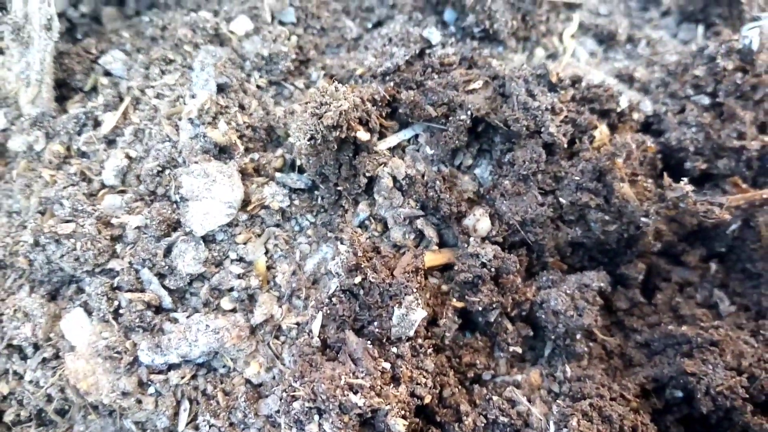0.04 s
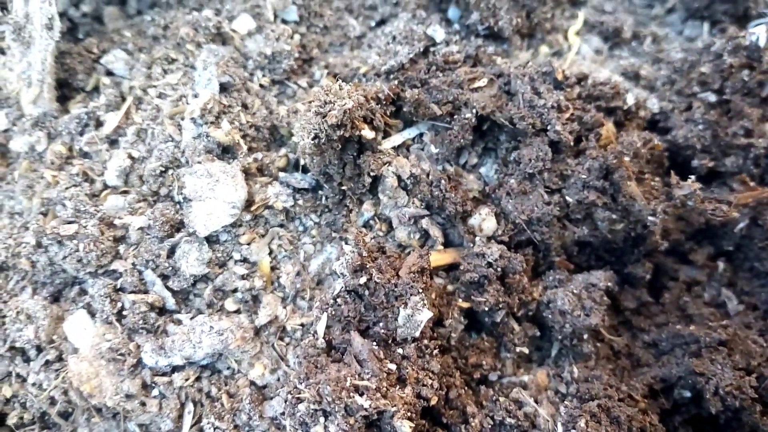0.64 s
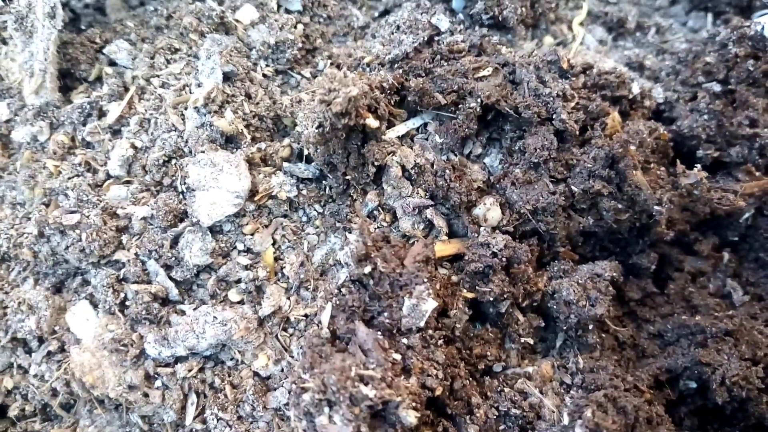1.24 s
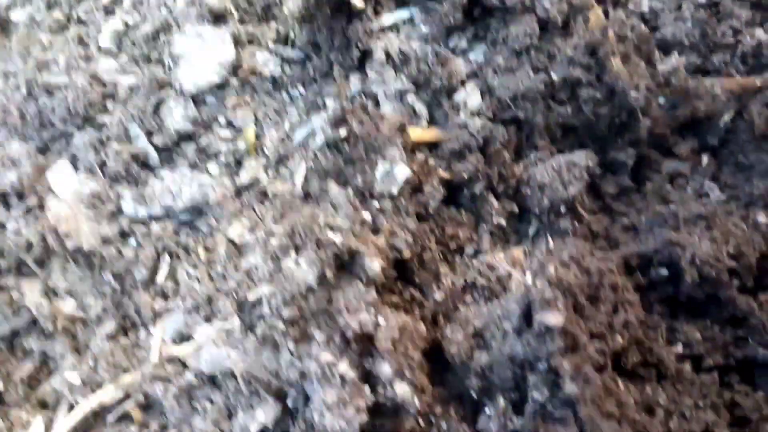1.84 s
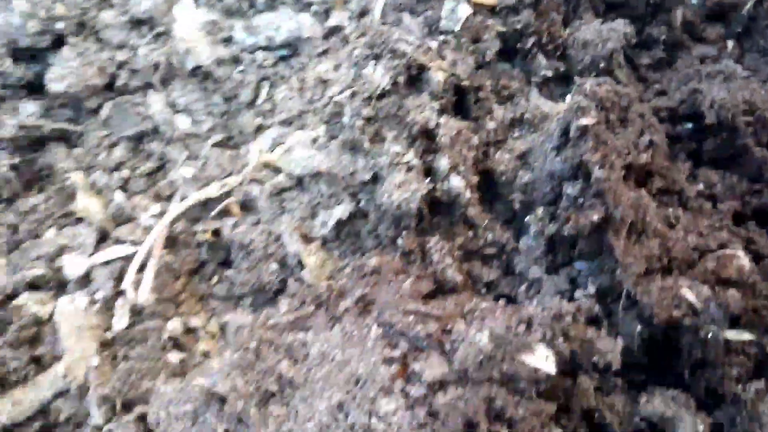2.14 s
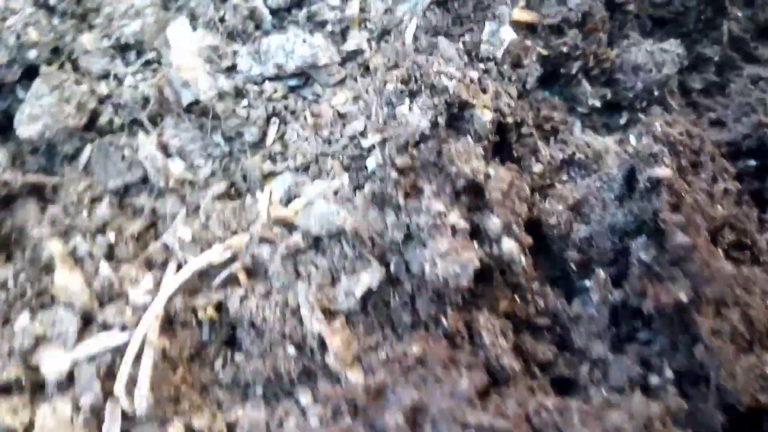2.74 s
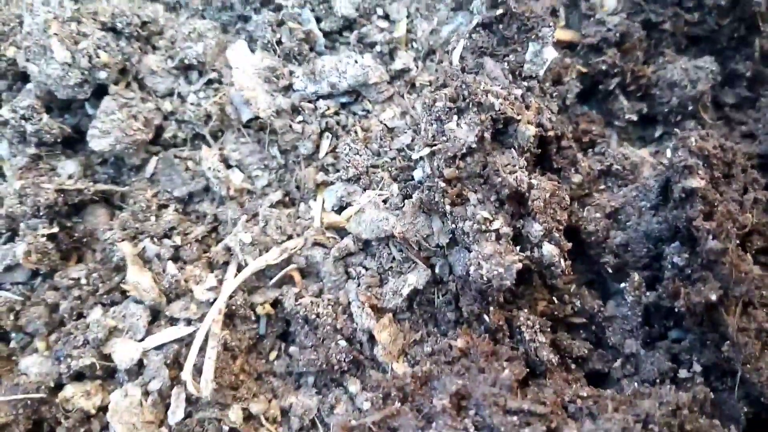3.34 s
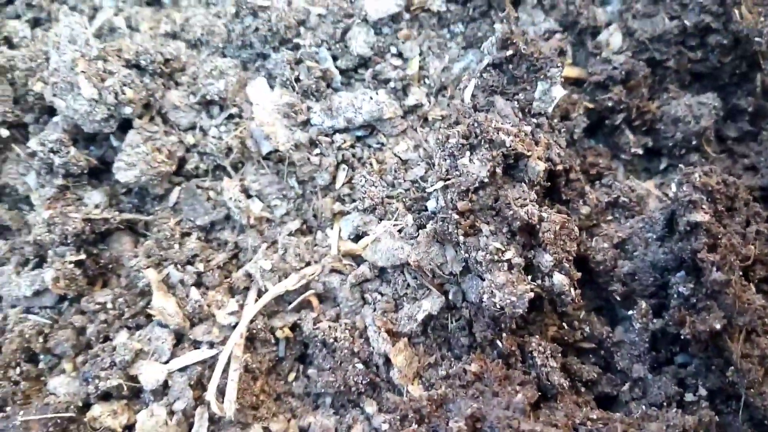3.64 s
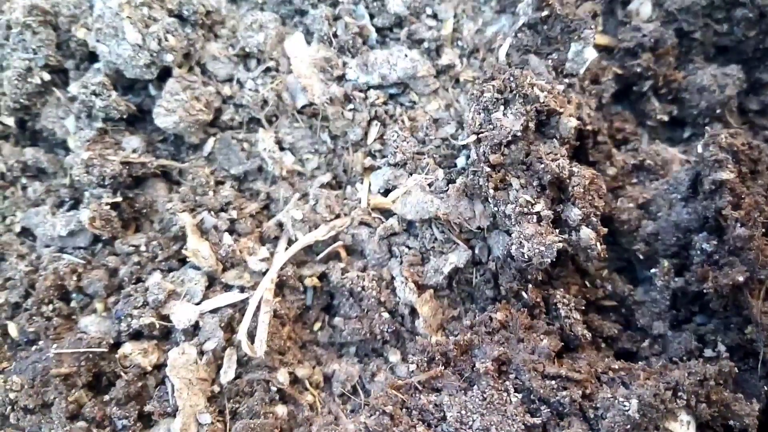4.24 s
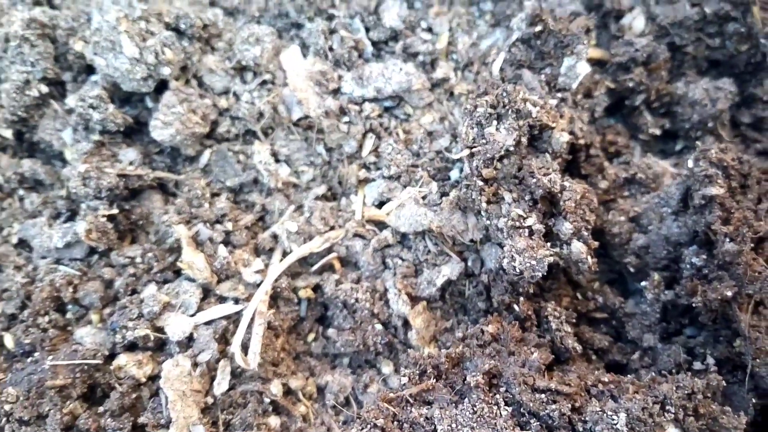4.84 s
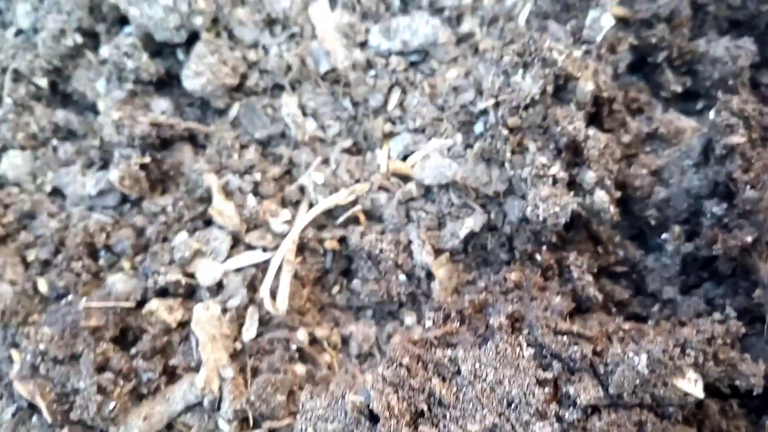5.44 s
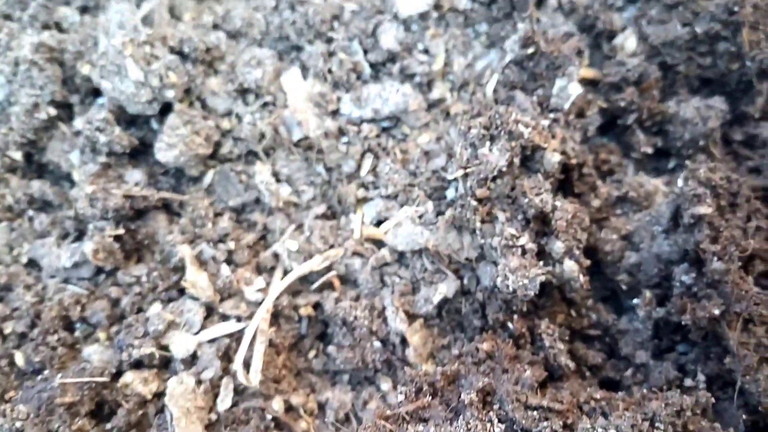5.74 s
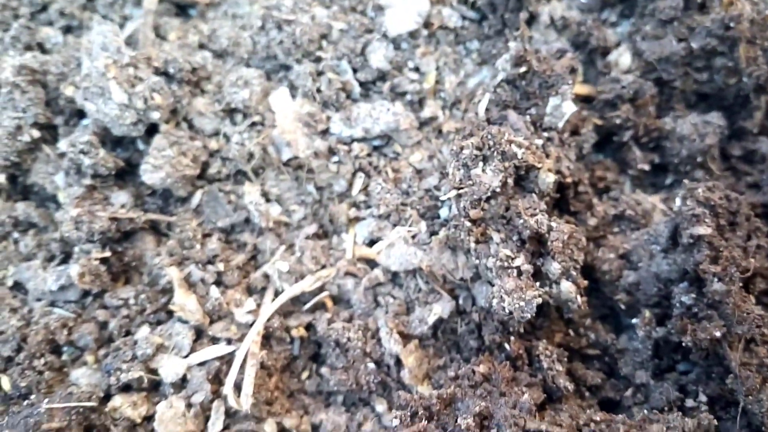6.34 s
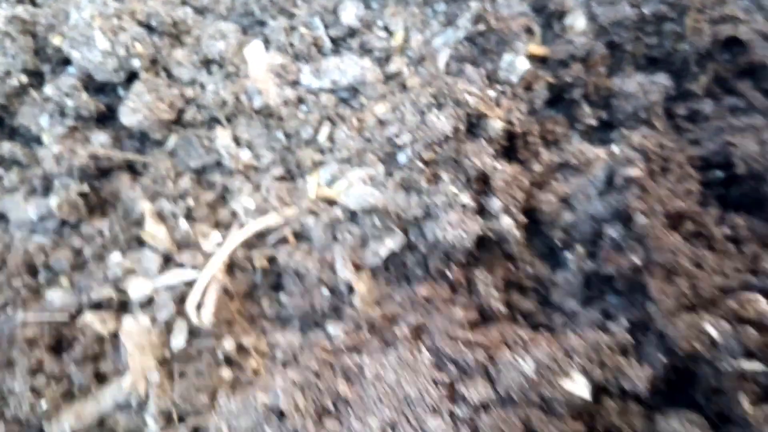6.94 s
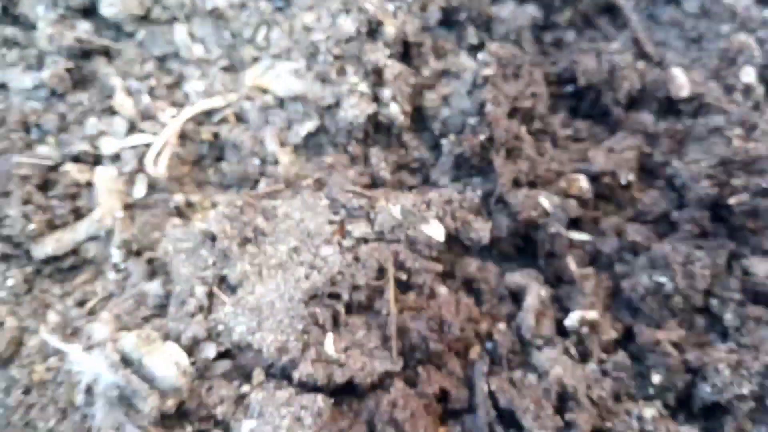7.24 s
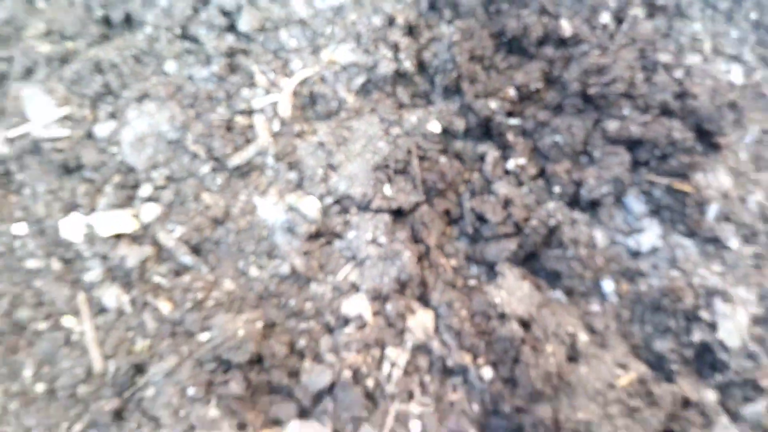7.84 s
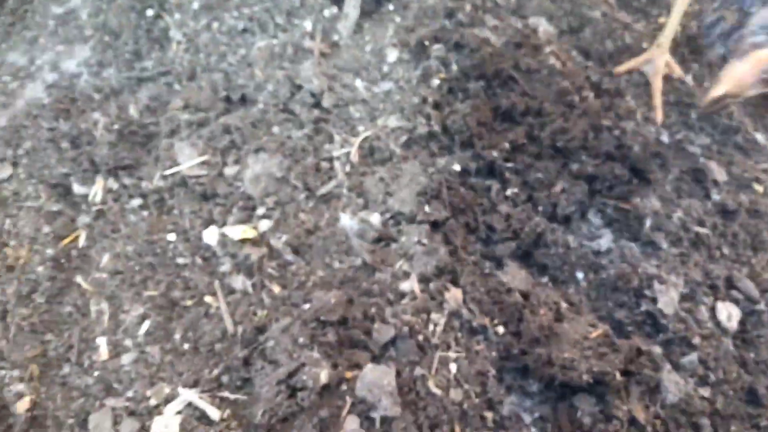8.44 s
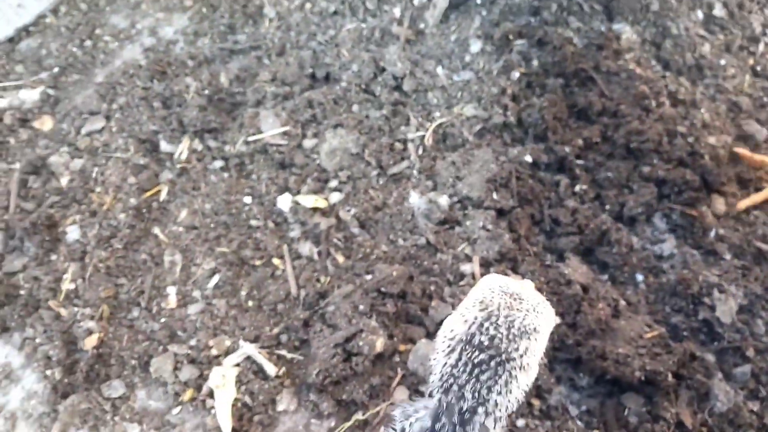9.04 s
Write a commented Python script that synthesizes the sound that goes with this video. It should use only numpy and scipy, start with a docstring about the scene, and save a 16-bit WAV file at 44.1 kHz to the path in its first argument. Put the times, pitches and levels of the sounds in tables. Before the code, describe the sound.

Young chicks peep in short, high whistles close to a single microphone just above loose farmyard soil, while beaks peck and feet scratch in the grit. A hen gives one soft, low cluck as the peeping gets busier. Past the middle a rooster crows once, loud and brassy, ringing off the walls. The chicks then resume, with one quick trill. A small bird chirps far off over a low outdoor rumble.

```python
"""A rooster crows once in a farmyard, and the walls ring after him.
His syrinx pulses through throat and open beak, rattling at the break between registers.
Close to the single microphone, just above loose soil, chicks peep and trill in near-sine whistles,
feet scratch, beaks peck in the grit, and a hen gives one low cluck before the crow.
Far off a small bird chirps over a low outdoor rumble; a faint ringing tone passes at the start."""
import sys
import numpy as np
from scipy import signal
from scipy.fft import rfft, irfft
from scipy.io import wavfile
from scipy.ndimage import uniform_filter1d, minimum_filter1d

SR = 44100
rng = np.random.default_rng(int(sys.argv[2]) if len(sys.argv) > 2 else 0)


def generate_wav(sig):
    """Save sig (samples, or channels by samples) to the path in sys.argv[1] as 16-bit PCM at SR."""
    pcm = np.round(np.clip(np.atleast_2d(sig).T, -1, 1) * 32767).astype(np.int16)
    wavfile.write(sys.argv[1], SR, pcm)


N = 404749
CUTOFF_HZ = 15800


def from_db(db):
    """Decibels to gain."""
    return 10 ** (np.asarray(db) / 20)


def rms_one(x):
    """Scale to rms 1."""
    return x / np.sqrt(np.mean(x ** 2) + 1e-20)


def at_hz(points, hz):
    """Read a curve on a log-frequency axis."""
    points = np.array(points)
    return np.interp(np.log(hz + 1e-9), np.log(points[:, 0]), points[:, 1])


def sampled(rows):
    """Sample times across a curve, and each of its columns at those times."""
    times, *columns = np.transpose(rows)
    t = np.arange(int(times[0] * SR), int(times[-1] * SR)) / SR
    return [t] + [np.interp(t, np.sort(times), column) for column in columns]


def add(out, start_s, sound):
    """Mix a sound in at its time."""
    at = int(round(start_s * SR))
    sound, at = sound[max(-at, 0):], max(at, 0)
    out[at:at + len(sound)] += sound[:max(N - at, 0)]


def coloured(x, spectrum, size=4096):
    """Minimum-phase filter with this spectral shape; white noise keeps its power."""
    gains = from_db(at_hz(spectrum, np.arange(size // 2 + 1) * SR / size))
    cepstrum = irfft(np.log(gains))
    cepstrum[1:size // 2] *= 2
    cepstrum[size // 2 + 1:] = 0
    response = irfft(np.exp(rfft(cepstrum)))
    return signal.fftconvolve(x, response / np.linalg.norm(response))[:len(x)]


def drift(rate_hz, size):
    """Smooth random wander with spread near 1: noise twice through a one-pole low-pass."""
    pole = np.exp(-2 * np.pi * rate_hz / SR)
    wander = signal.lfilter([1], [1, -2 * pole, pole * pole], rng.standard_normal(size + SR))
    return rms_one(wander)[-size:]


def swell(u, crest, power):
    """Rise to 1 at the crest and fall again, for u from 0 to 1."""
    triangle = np.interp(u, [0, np.clip(crest, .05, .95), 1], [0, 1, 0])
    return np.sin(np.pi / 2 * triangle) ** power


def bump(t, centre_s, width_s):
    """A smooth rise and fall about one moment."""
    return np.exp(-((t - centre_s) / width_s) ** 2)


def phase_of(pitch):
    """Running phase of an oscillator."""
    return 2 * np.pi * np.cumsum(pitch) / SR


def harmonics(pitch, throat, count):
    """Pulses of the syrinx heard through the throat: one row per harmonic, and their frequencies."""
    k = np.arange(1, count + 1)[:, None]
    gains = from_db(at_hz(throat, k * pitch)) * (k * pitch < CUTOFF_HZ)
    gains = gains / np.sqrt(np.sum(gains ** 2, axis=0) / 2)
    return gains * np.cos(k * phase_of(pitch)), k * pitch


def whistle(pitch, octave_db, jitter, flutter_db):
    """A near-sine whistle; it dulls above 6 kHz, so lower notes keep more overtones."""
    # the treble falls away: f/Hz, gain/dB
    treble_rolloff = [(1700, -5), (2300, -0.5), (6000, -0.5), (7000, -17.5), (8000, -31), (12000, -20.5),
                      (15000, -23.5)]
    phase = phase_of(pitch * (1 + jitter * drift(600, len(pitch))))
    partials = [(1, 0), (2, octave_db), (3, octave_db - 10)]
    tone = sum(from_db(db + at_hz(treble_rolloff, k * pitch)) * np.sin(k * phase) for k, db in partials)
    return np.sqrt(2) * tone * from_db(flutter_db * drift(160, len(pitch)))


def outdoors(hiss_db=-61):
    """The bed of the place: a low, wavering rumble of open air and a thin hiss."""
    # spectrum of the rumble: f/Hz, relative density/dB
    rumble_spectrum = [(15, -61), (25, -21.5), (37, -14.5), (59, -12), (112, 1), (231, -9.5), (405, -19),
                       (592, -20), (997, -26.5), (1520, -27.5), (1710, -30), (2510, -28), (2710, -29),
                       (3000, -33.5), (3900, -76.5), (6600, -120)]
    # course of the rumble: t/s, relative level/dB
    rumble_levels = [(0, -46), (5.5, -44.5), (5.75, -47.5), (6.26, -50), (6.381, -45.5), (7.0, -41.5),
                     (9.17, -44.5)]
    # spectrum of the hiss: f/Hz, relative density/dB
    hiss_spectrum = [(1000, -3.5), (2500, -6), (4500, 2.5), (6300, -4), (7800, -16), (13800, -19),
                     (15200, -7), (16000, -17)]
    level_db = np.interp(np.arange(N) / SR, *np.transpose(rumble_levels)) - 1 + .68 * drift(11, N)
    rumble = from_db(level_db) * coloured(rng.standard_normal(N), rumble_spectrum)
    return rumble + from_db(hiss_db) * coloured(rng.standard_normal(N), hiss_spectrum)


def ringing():
    """A faint cluster of steady tones swells and fades."""
    # course of the ringing: t/s, level/dB
    envelope = [(.08, -65), (.16, -46), (.26, -39), (.32, -46.5), (.46, -48.5), (.66, -55.5)]
    # its tones: f/Hz, relative level/dB
    tones = [(2920, -14), (3310, -3.5), (3760, -17), (4160, -11.5)]
    t, level_db = sampled(envelope)
    out = np.zeros(N)
    for hz, db in tones:
        tone = whistle(np.full(len(t), hz), octave_db=-40, jitter=.0089, flutter_db=2.5)
        add(out, t[0], from_db(level_db + db) * tone)
    return out


def far_bird(upper_hz=4620, lower_hz=4230, sag=.28, scatter_t60_s=.69):
    """Hoarse two-voiced chirps, the lower voice sagging at the end, smeared by distance."""
    # chirps: t/s, length/s, relative level/dB
    chirps = [(-.03, 0.13, -44.5), (.72, .14, -42.5), (2.822, 0.14, -29), (4.532, 0.073, -31),
              (7.157, .14, -27.5), (9.128, 0.098, -31)]
    direct = np.zeros(N)
    for start, length, db in chirps:
        u = np.linspace(0, 1, int(length * SR))
        upper = whistle(np.full(len(u), upper_hz), octave_db=-24, jitter=.027, flutter_db=-4)
        lower = whistle(lower_hz * (1 - sag * u ** 4), octave_db=-36, jitter=.03, flutter_db=3.5)
        add(direct, start, from_db(db) * swell(u, .56, power=.58) * (upper + lower) / 2)
    paths = rng.standard_normal(SR // 2) * from_db(-60 * np.arange(SR // 2) / SR / scatter_t60_s)
    scattered = signal.fftconvolve(direct, paths / np.linalg.norm(paths))[:N]
    return .41 * direct + .39 * scattered


def yard(x, wall_hz=2200, build_s=.032):
    """A few dull wall echoes and a diffuse tail that rings longest near 1.5 kHz."""
    # echoes off the walls: delay/s, level/dB
    echoes = [(.0125, -18), (.031, -12), (.058, -13), (.092, -21.5)]
    # bands of the tail: f/Hz, level/dB, t60/s
    tail = [(600, -4.5, 0.48), (1110, -27.5, 0.37), (1520, -6, 0.92), (1840, -3, .45), (3000, -10.5, 0.75),
            (5560, -28, 0.22)]
    t, response = np.arange(SR) / SR, np.zeros(SR)
    for delay, db in echoes:
        response[int(delay * SR)] += from_db(db)
    response = signal.sosfilt(signal.butter(2, wall_hz, fs=SR, output="sos"), response)
    centres = np.array(tail)[:, 0]
    edges = [100, *np.sqrt(centres[1:] * centres[:-1]), CUTOFF_HZ]
    for (_, db, t60), low, high in zip(tail, edges, edges[1:]):
        decay = from_db(-60 * t / t60) * np.clip(t / build_s, 0, 1)
        diffuse = rng.standard_normal(SR) * decay / np.linalg.norm(decay)
        band = signal.butter(2, [low, high], "band", fs=SR, output="sos")
        response += from_db(db) * signal.sosfilt(band, diffuse)
    return signal.fftconvolve(x, response)[:N]


def grains(per_s, spread_db, size):
    """Crumbs of soil clicking at random, a few much louder than the rest; rms 1."""
    strengths = from_db(spread_db * np.minimum(rng.exponential(1, size), 4))
    clicks = strengths * rng.standard_normal(size)
    return rms_one(clicks * (rng.random(size) < per_s / SR))


def soil(rustle_db=-57.5, tick_count=24, crack_decay_s=.0008):
    """Just under the microphone: crumbs always shifting, scratching strokes and sharp pecks."""
    # the flock moves about: t/s, length/s, relative level/dB
    shuffles = [(.9, 1.76, -68.5), (2.857, 0.36, -43.5), (3.2, 1.17, -50), (4.235, 0.67, -46),
                (7.627, 0.98, -46.5), (8.617, 0.28, -49)]
    # feet scratching through the soil: t/s, length/s, level/dB
    scratches = [(2.929, 0.022, -31.5), (2.96, 0.11, -38.5), (2.997, 0.034, -26.5), (3.655, 0.065, -40.5),
                 (3.844, 0.072, -29), (3.89, 0.017, -25), (3.917, 0.036, -39.5), (4.095, 0.047, -31),
                 (4.153, 0.031, -38), (4.328, 0.031, -36.5), (4.599, 0.037, -37.5), (4.681, 0.024, -32),
                 (6.80, 0.043, -40), (8.434, 0.055, -31.5), (8.489, 0.014, -28), (8.569, .035, -42.5),
                 (8.68, 0.16, -38)]
    # pecks and snapping grit: t/s, relative crack level/dB, relative knock level/dB
    pecks = [(.2814, -28, -44), (.9549, -13, -62), (1.0243, -25, -64), (1.1205, -25.5, -65),
             (1.3765, -25, -53), (1.5572, -21, -62), (1.6945, -21, -52), (2.5965, -18, -58.5),
             (2.9392, -8, -46), (2.981, -8.5, -45), (3.0698, -26, -36), (3.1854, -12.5, -38),
             (3.361, -22, -39.5), (4.6459, -9.5, -55), (4.6852, -18, -53), (4.7148, -20, -47.5),
             (4.998, -16, -47), (5.2645, -14.5, -44.5), (7.6315, -23, -48), (8.518, -16, -40),
             (8.5424, -25, -45), (8.6537, -16, -53)]
    # bright grit near 5 kHz, plus a thin hiss near 15 kHz that follows its level:
    # f/Hz, relative density/dB
    grit_and_hiss = [(500, -18.5), (1500, -12.5), (2600, -6.5), (3600, 2), (4800, 10), (5700, 3.5),
                     (6600, -6), (7600, -22), (10000, -25), (14000, -36), (15300, -19)]
    # the duller knock of a peck, same columns
    knock_spectrum = [(300, 6), (1200, 4), (3000, 11.5), (4500, -18.5), (9000, -54)]
    movement = np.full(N, from_db(rustle_db))
    for start, length, db in shuffles:
        u = np.linspace(0, 1, int(length * SR))
        add(movement, start, from_db(db - 1) * swell(u, .38, power=.65))
    force = movement * grains(per_s=4000, spread_db=4.2, size=N)
    for start, length, db in scratches:
        u = np.linspace(0, 1, int(length * SR))
        crumbs = grains(per_s=1800, spread_db=1.5, size=len(u))
        add(force, start, from_db(db) * swell(u, .42, power=.7) * crumbs)
    knocks = np.zeros(N)
    decay = np.exp(-np.arange(SR // 50) / SR / crack_decay_s)
    # fainter pecks at random moments
    ticks = [(rng.uniform(0, N / SR), *rng.normal([-36, -53], 5)) for _ in range(tick_count)]
    for start, crack_db, knock_db in [*pecks, *ticks]:
        crack = rms_one(rng.standard_normal(len(decay)) * decay)
        add(force, start, from_db(crack_db - 7) * crack * decay.std())
        add(knocks, start, from_db(knock_db - 6) * crack)
    return coloured(force, grit_and_hiss) + coloured(knocks, knock_spectrum)


def hen(upper_hz=870, width_hz=170, jitter=.016):
    """One soft, throaty cluck close by; as the beak parts, a higher resonance comes forward."""
    # the cluck: t/s, pitch/Hz, level/dB
    cluck = [(3.215, 177.4, -49), (3.227, 180.3, -36), (3.251, 193.5, -25.5), (3.287, 201.8, -20),
             (3.385, 186.2, -30.5), (3.405, 205, -49)]
    # her throat: f/Hz, gain/dB
    throat = [(190, 4), (390, -4), (600, 10.5), (790, -3.5), (980, -6), (1180, -27), (1700, -30),
              (2100, -13.5), (2500, -45), (4500, -21), (7000, -62)]
    # the beak parts mid-call: t/s, lift of the upper resonance/dB
    opening = [(3.215, -5.5), (3.30, -4), (3.32, 5), (3.35, 8), (3.37, 4), (3.405, 5)]
    t, pitch, level_db = sampled(cluck)
    partials, hz = harmonics(pitch * (1 + jitter * drift(90, len(t))), throat, count=34)
    lift_db = np.interp(t, *np.transpose(opening)) * np.exp(-((hz - upper_hz) / width_hz) ** 2)
    voice = np.sum(partials * from_db(lift_db), axis=0)
    out = np.zeros(N)
    add(out, t[0], -from_db(level_db) * voice * signal.windows.tukey(len(t), .1))
    return out


def off_ground(call, bounce=.44, longest_s=.0028):
    """The bounce off the soil reaches the microphone later and ripples the level of a gliding note."""
    lag = int(rng.uniform(.3, 1) * longest_s * SR)
    return np.pad(call, (0, lag)) + bounce * np.pad(call, (lag, 0))


def peep(pitch, crest, db, reedy_db=0, reedy_hz=2400, loss_db_per_octave=31, bend=.012):
    """One push of air through a chick's syrinx, never quite steady; the lower, the reedier."""
    octave_db = reedy_db - .5 - loss_db_per_octave * np.log2(pitch.mean() / reedy_hz)
    push = swell(np.linspace(0, 1, len(pitch)), crest, power=.73)
    pitch = pitch * (1 + bend * drift(50, len(pitch)))
    return from_db(db) * off_ground(push * whistle(pitch, octave_db, jitter=.012, flutter_db=2))


def chicks():
    """Close peeps arch over a top note or slide evenly in pitch; several often overlap."""
    # arched peeps: t/s, length/s, top/Hz, end/Hz, top at/0-1, loudest at/0-1, level/dB, reediness/dB
    arches = [(0.285, .085, 5550, 3480, 0.09, 0.9, -35.5, 0),
              (0.374, 0.054, 2935, 1970, 0.44, 0.43, -36, -2),
              (1.897, 0.054, 2625, 2070, 0.37, 0.4, -35, 4), (2.46, .056, 2600, 2000, .5, .7, -45, 0),
              (3.096, .06, 2915, 2000, 0.56, 0.44, -30.5, 0), (3.4, 0.064, 2790, 1990, .15, 0.2, -42, 3),
              (3.534, 0.049, 3170, 2200, 0.08, 0.46, -30.5, -2),
              (3.602, 0.054, 2990, 1820, 0.39, 0.52, -24.5, 2),
              (3.794, .046, 5450, 4400, 0.07, .33, -13.5, 9), (4.113, 0.073, 3564, 2095, .3, 0.3, -27, 0),
              (4.486, 0.049, 3380, 2280, 0.2, 0.62, -22.5, -2), (4.93, .051, 3800, 3070, 0, .6, -23, -4),
              (5.199, 0.056, 3410, 2920, 0.47, 0.7, -36.5, 3),
              (7.614, 0.013, 2580, 1890, .1, 0.4, -35, 0.5), (7.923, 0.035, 4420, 3290, 0.34, .4, -29, -7),
              (8.006, .052, 2906, 1950, 0.4, .53, -25.5, -26), (8.293, .03, 4570, 4000, .65, .75, -31, -2),
              (8.324, .028, 5540, 5070, .02, 0.47, -23, 1),
              (8.901, 0.065, 3294, 2180, 0.18, 0.23, -25.5, -3),
              (9.056, 0.034, 3540, 3150, 0.3, 0.3, -21, -13)]
    # sliding peeps, mostly downward: t/s, length/s, start/Hz, end/Hz, loudest at/0-1, level/dB
    slides = [(2.217, 0.019, 3100, 5300, 0.5, -29), (2.238, 0.054, 4600, 2593, 0.17, -21),
              (2.297, 0.077, 3400, 2890, .5, -45), (2.465, .051, 4600, 3110, 0.72, -34),
              (3.222, .046, 4200, 3360, 0.14, -33.5), (3.413, 0.059, 5200, 2770, 0.27, -14.5),
              (3.46, 0.086, 3700, 2590, 0.03, -34), (3.592, 0.045, 5300, 3600, 0.47, -16.5),
              (3.625, .048, 5200, 2790, 0, -29.5), (3.46, 0.045, 4750, 3900, .2, -35),
              (3.692, 0.061, 3900, 2120, 0.05, -29.5), (3.82, 0.025, 2750, 3750, 0.9, -29),
              (3.823, 0.042, 4250, 2450, 0.28, -14), (3.866, 0.048, 4700, 2470, 0.87, -26),
              (4.923, 0.033, 4100, 4610, .6, -32.5), (7.958, 0.064, 4700, 3220, .2, -36.5),
              (7.971, 0.071, 3500, 2230, 1, -36), (8.125, .058, 4300, 2390, 0.91, -25),
              (8.126, .057, 3300, 2560, 0.3, -30.5), (8.164, 0.071, 4750, 2800, 0, -27),
              (8.3, 0.051, 4200, 2630, 0.6, -28), (8.763, .041, 5950, 4600, .5, -38),
              (8.772, 0.073, 4550, 2990, 0.7, -29.5), (8.955, 0.046, 4700, 3060, .6, -33),
              (8.976, 0.069, 4200, 2750, 0.1, -30.5), (8.975, 0.066, 5470, 4300, .85, -29),
              (9.043, 0.019, 4450, 3560, 0.7, -25)]
    out = np.zeros(N)
    for start, length, top_hz, end_hz, top_at, crest, db, reedy_db in arches:
        u = np.linspace(0, 1, int(length * SR))
        pitch = top_hz + (end_hz - top_hz) * ((u - top_at) / (1 - top_at)) ** 2
        add(out, start, peep(pitch, crest, db, reedy_db))
    for start, length, start_hz, end_hz, crest, db in slides:
        add(out, start, peep(np.geomspace(start_hz, end_hz, int(length * SR)), crest, db))
    return out


def trill(start_s=8.349, length_s=.15, period_s=.0203, top_at_s=.0545, level_db=-21, throb_db=3):
    """A startled chick's pitch swings fast, high and narrow at first, then lower and wider."""
    t, out = np.arange(int(length_s * SR)) / SR, np.zeros(N)
    alarm = np.exp(-t / .03)
    centre_hz = np.interp(alarm, [0, 1], [3550, 4960])
    swing_hz = np.interp(alarm, [0, 1], [840, 400])
    turn = np.cos(2 * np.pi * (t - top_at_s) / period_s + .2 * drift(40, len(t)))
    voice = whistle(centre_hz + swing_hz * turn, octave_db=-20, jitter=.028, flutter_db=2.5)
    throb = from_db(level_db - throb_db * turn)   # loudest at the bottom of each swing
    add(out, start_s, off_ground(throb * swell(t / length_s, .53, power=.64) * voice))
    return out


def rooster(jitter=.041, shimmer=.17, hoarseness=.04, rasp_db=-11, beak_hz=4000, throat_low_hz=420):
    """Clean and brassy on held notes; the membranes rattle where the pitch breaks between registers."""
    # four syllables in one breath, each scooping up; rows of t/s, pitch/Hz, level/dB, brightness/dB
    syllables = [
        [(5.436, 445, -40, -8), (5.444, 520, -19, -1), (5.47, 552, -16.5, -4.5), (5.482, 661, -15, 0.5),
         (5.57, 693.4, -13.5, 0), (5.598, 687, -12, -4), (5.615, 597, -21.5, 5), (5.645, 426, -30, -17)],
        [(5.70, 424, -34, -15.5), (5.715, 510, -26.5, 0.5), (5.735, 592, -15.5, 5), (5.745, 710, -11, -1),
         (5.76, 751, -16, 9), (5.805, 749.7, -9.5, 5.5), (5.825, 699.4, -16, -1), (5.86, 685.4, -18.5, 3.5)],
        [(5.96, 707, -10, -5), (5.985, 732, -10, 2.5), (6.03, 750, -16, 10.5), (6.075, 745, -14.5, 7),
         (6.17, 707, -15, -1), (6.286, 682, -15.5, -0.5), (6.298, 653, -13, -7), (6.328, 618.5, -18.5, -4),
         (6.35, 496, -22, -8), (6.405, 446.7, -24, -2)],
        [(6.45, 454, -30, -4), (6.50, 480, -25, 2.5), (6.545, 531, -19.5, -5), (6.553, 667.4, -17, -1.5),
         (6.63, 681.8, -15.5, -3.5), (6.67, 673.6, -15.5, -2.5), (6.692, 630.4, -21, 10),
         (6.71, 597, -14.5, -18), (6.735, 440, -43, -17)],
    ]
    # his throat and open beak: f/Hz, gain/dB
    throat = [(300, -36), (450, -14.5), (540, 6.5), (700, 2), (1000, -2.5), (1400, -3.5), (1750, -30),
              (2150, -21.5), (2600, -26), (3500, -19.5), (4450, -13.5), (5100, -7), (5700, -23.5),
              (7500, -48), (10500, -60), (15000, -63)]
    # rattle around the register break: pitch/Hz, roughness/0-1
    roughness = [(440, .55), (490, 0.53), (610, 0.96), (652, 0.74), (674, .15), (740, .08)]
    # turbulent air in the throat: f/Hz, relative density/dB
    rasp_spectrum = [(330, -36), (520, -4.5), (800, -1), (1400, -4), (1800, -14), (2300, -8), (2800, -14.5),
                     (3500, -6.5), (5100, -3), (5900, -15), (7500, -39), (15000, -49)]
    t, pitch, level_db, bright_db = sampled([row for syllable in syllables for row in syllable])
    size, out = len(t), np.zeros(N)
    ease = bump(t, 6.688, .022)   # the last fall starts smoothly, without a break
    rough = at_hz(roughness, pitch) ** 2 * (1 - ease)
    waver = .003 * drift(35, size) + .0015 * drift(400, size)
    # the pitch shakes at the top of the long note
    quaver = .021 * bump(t, 6.11, .053) * np.cos(2 * np.pi * (t - 6.11) / .031)
    pitch = pitch * (1 + waver + quaver + jitter * rough * drift(300, size))
    partials, hz = harmonics(pitch, throat, count=26)
    # effort lifts the treble, and each overtone swells and sinks on its own
    lift_db = bright_db / (1 + (beak_hz / hz) ** 12)
    depth_db = np.r_[0, 2.5, np.full(len(hz) - 2, 4.5)][:, None]
    flicker_db = depth_db * np.array([drift(23.7, size) for _ in hz])
    voice = np.sum(partials * from_db(lift_db + flicker_db), axis=0)
    # uneven and strong-weak pulses fill the gaps between harmonics
    phase = phase_of(pitch)
    doubling = .074 * rough + .19 * bump(t, 5.855, .02)   # most as the second syllable ends
    voice *= 1 + rough * shimmer * drift(340, size) + doubling * np.cos(phase / 2)
    voice = signal.sosfilt(signal.butter(6, throat_low_hz, "high", fs=SR, output="sos"), voice)
    # air rasps with each pulse; effort adds a little hoarseness
    rasp = coloured(rng.standard_normal(size) * (1 + np.cos(phase)), rasp_spectrum)
    rasp_gain = from_db(rasp_db) * (rough + hoarseness * from_db(bright_db))
    add(out, t[0], from_db(level_db) * (voice + rasp_gain * rasp))
    return out


def scene(near_send_db=-20):
    """Chicks, hen and soil are close and nearly dry; the rooster sets the whole yard ringing."""
    crow = rooster()
    near = chicks() + trill() + hen() + soil()
    echoes = yard(crow + from_db(near_send_db) * near)
    return (crow + near + echoes + far_bird() + ringing() + outdoors())[None]


def record(dry, ceiling_db=-4):
    """Behind the microphone, a limiter holds the crow under a ceiling; the top is cut steeply."""
    window = SR // 100
    gain = np.minimum(1, from_db(ceiling_db) / (np.abs(dry) + 1e-9))
    gain = uniform_filter1d(minimum_filter1d(gain, 2 * window), window)
    return signal.sosfilt(signal.ellip(10, .1, 80, CUTOFF_HZ, fs=SR, output="sos"), dry * gain)


dry = scene()
out = record(dry)
generate_wav(out)
```